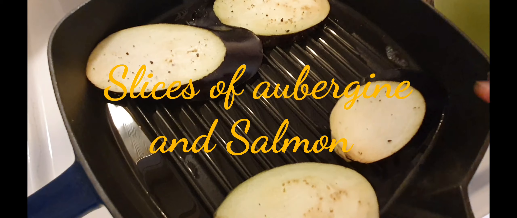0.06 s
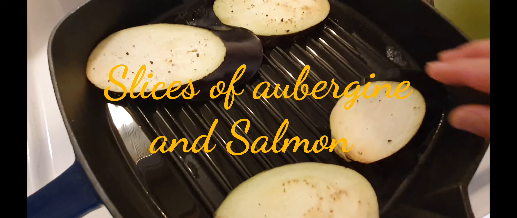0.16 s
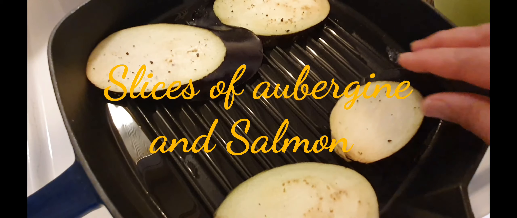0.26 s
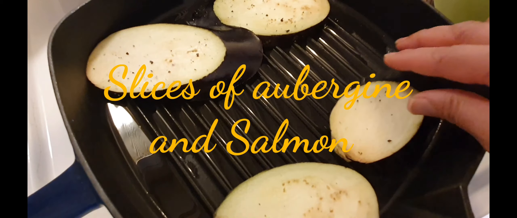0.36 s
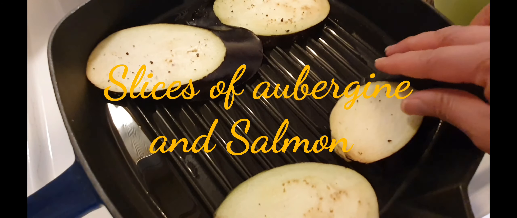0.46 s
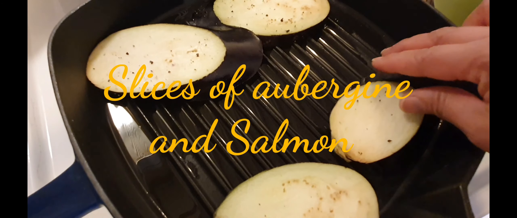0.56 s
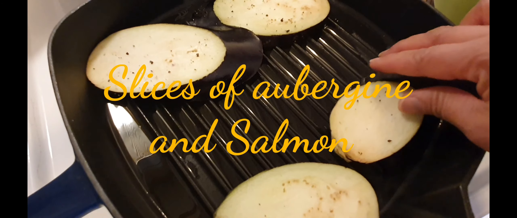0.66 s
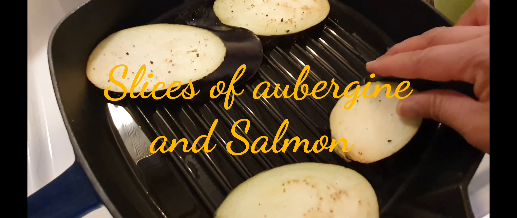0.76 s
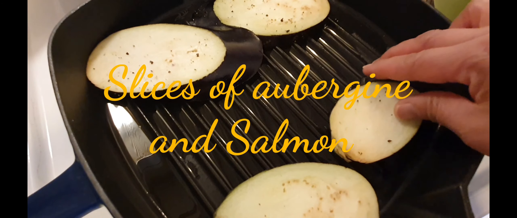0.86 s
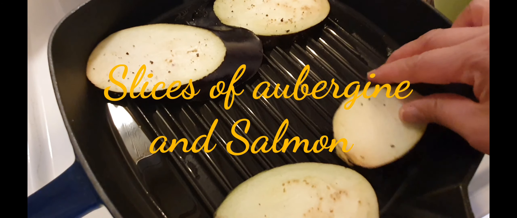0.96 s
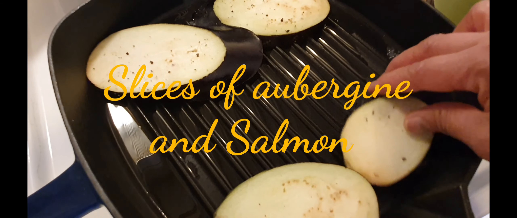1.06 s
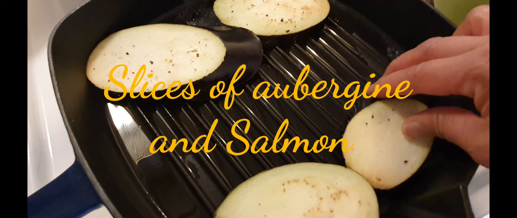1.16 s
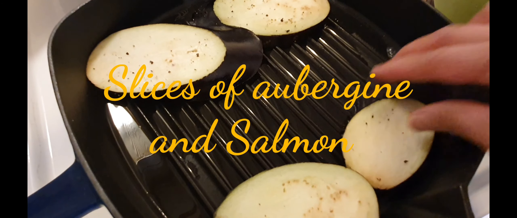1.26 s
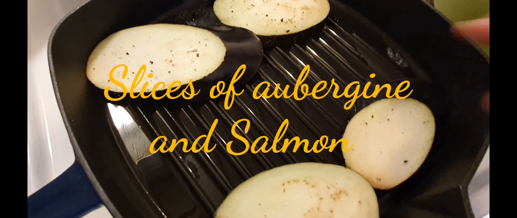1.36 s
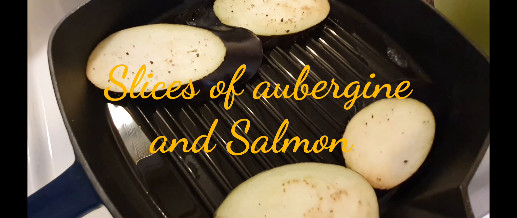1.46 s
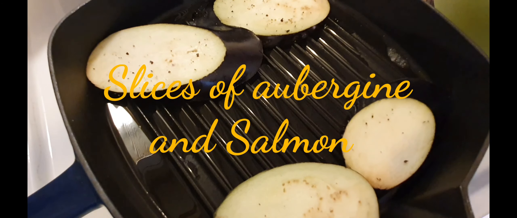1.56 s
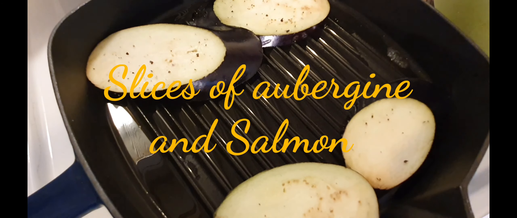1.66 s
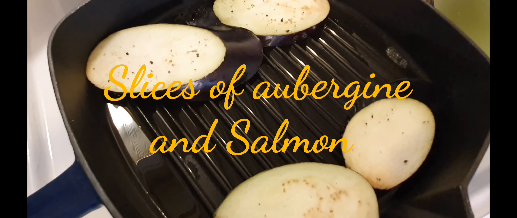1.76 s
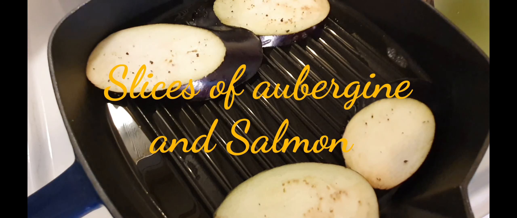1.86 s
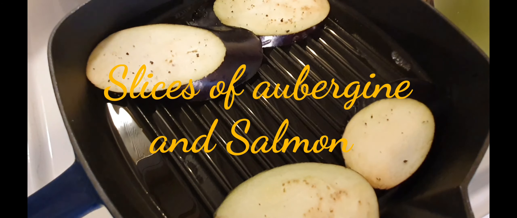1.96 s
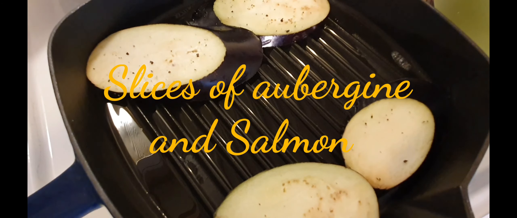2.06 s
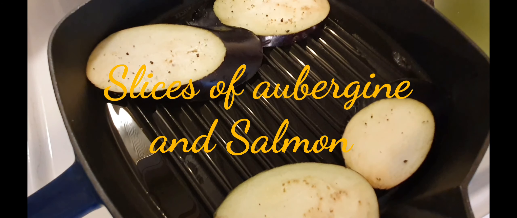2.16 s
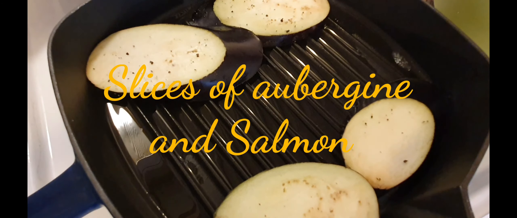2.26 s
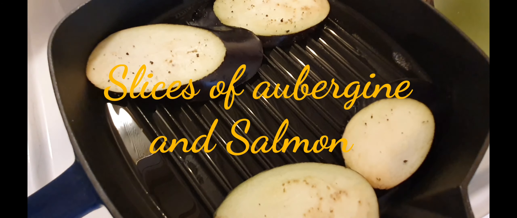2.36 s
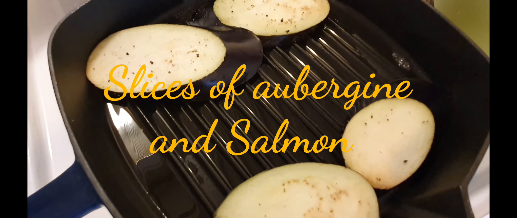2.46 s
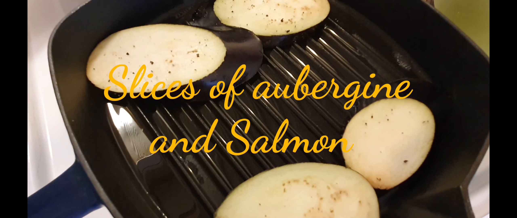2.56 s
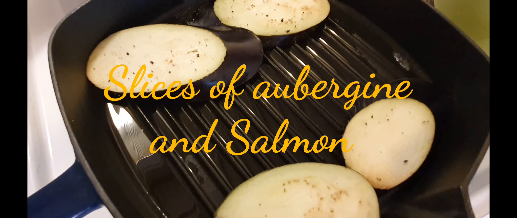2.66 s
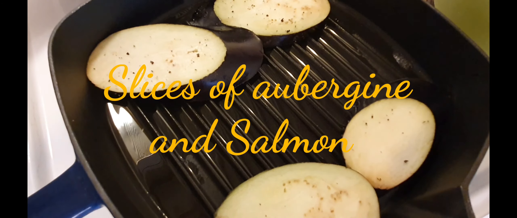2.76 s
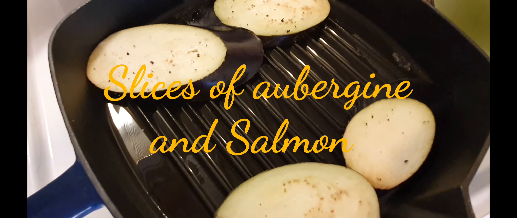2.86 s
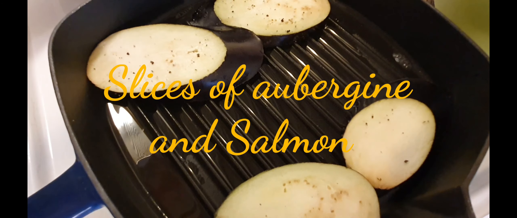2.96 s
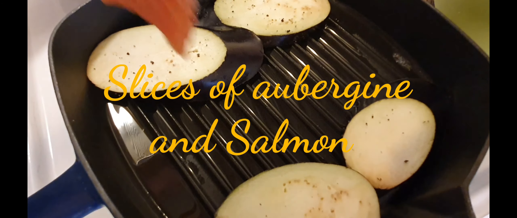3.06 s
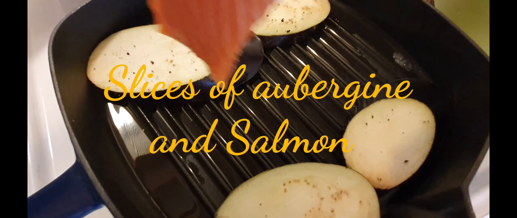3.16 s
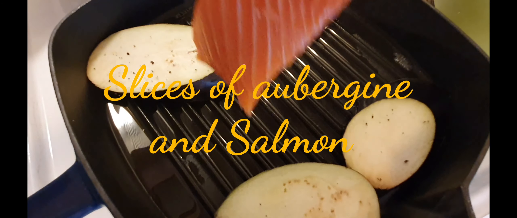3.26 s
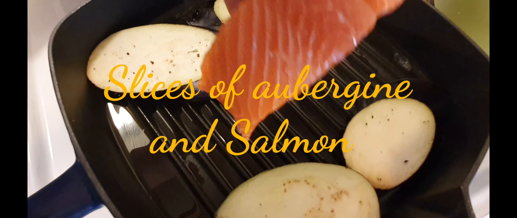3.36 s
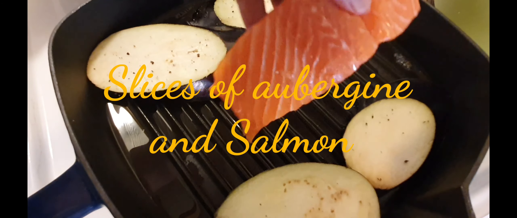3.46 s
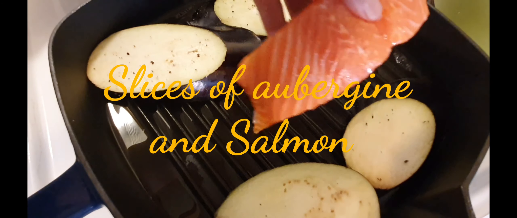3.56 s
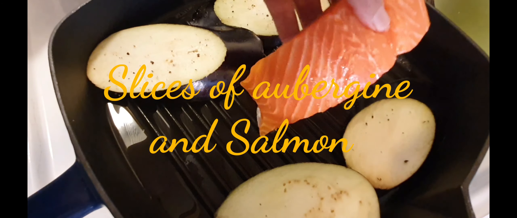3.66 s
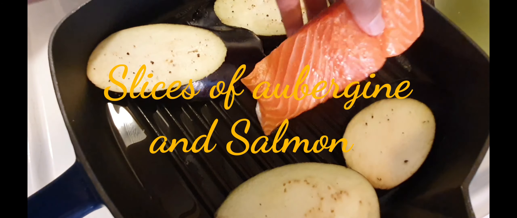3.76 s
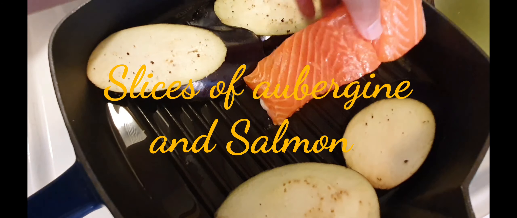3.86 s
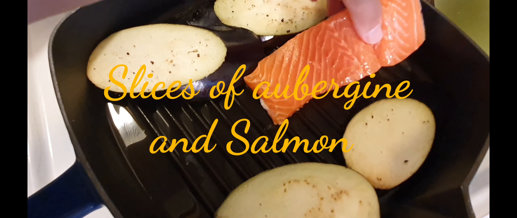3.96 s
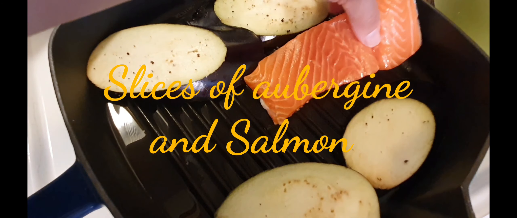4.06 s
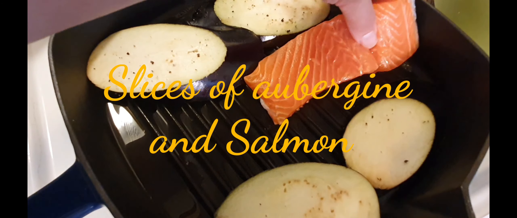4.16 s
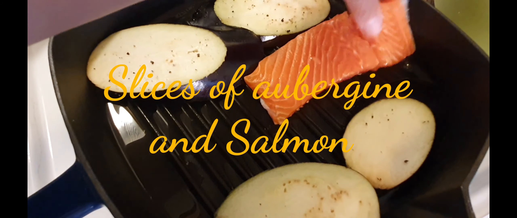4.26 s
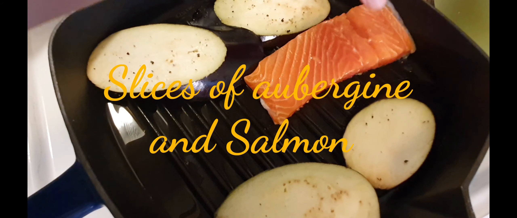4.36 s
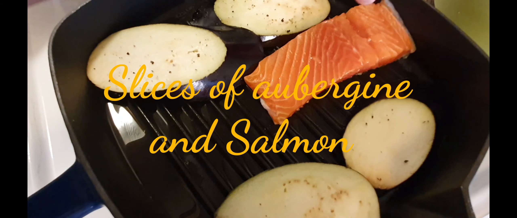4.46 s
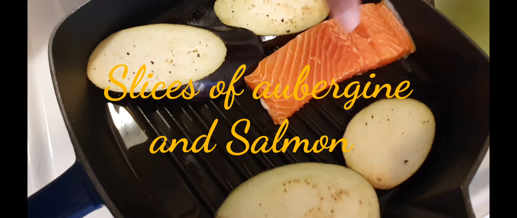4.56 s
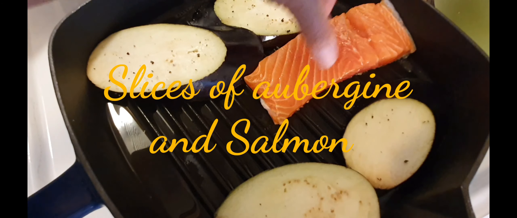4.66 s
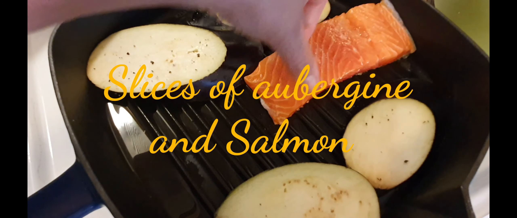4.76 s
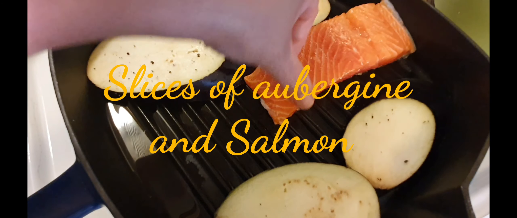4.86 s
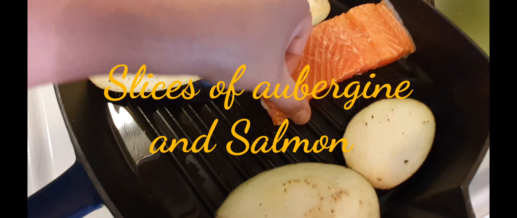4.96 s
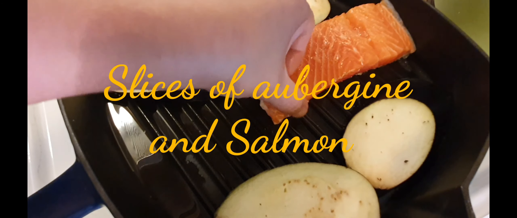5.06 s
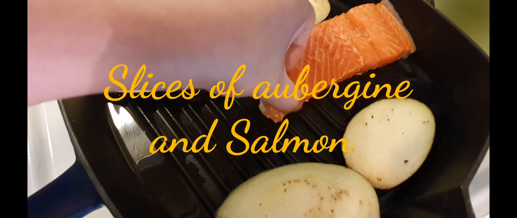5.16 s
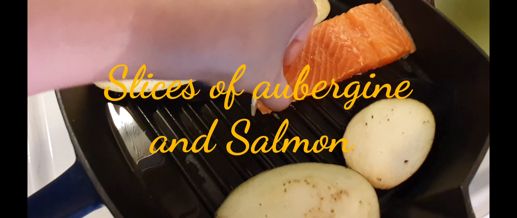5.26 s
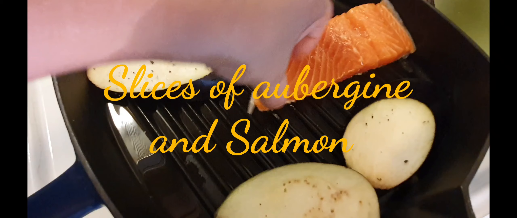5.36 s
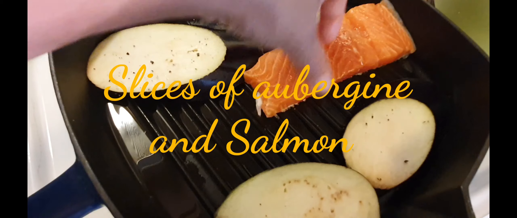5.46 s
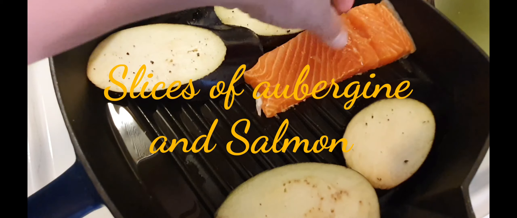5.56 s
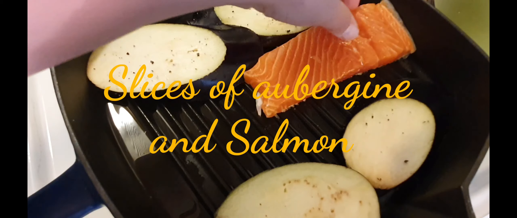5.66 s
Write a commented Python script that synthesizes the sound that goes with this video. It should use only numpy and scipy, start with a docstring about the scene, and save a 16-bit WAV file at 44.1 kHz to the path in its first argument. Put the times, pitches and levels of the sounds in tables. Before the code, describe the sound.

A thin, bright frying hiss opens over low hand rumble, slightly stronger at first, then settling quieter with isolated oil snaps. A brief low judder and soft knocks from the hand on the microphone precede the salmon being laid down. Sharp pops then crowd together, some crisp and some wet, with flares of sizzle as it is pressed. Close, small kitchen, faint iron ring.

```python
"""Salmon and aubergine on a ridged grill pan

Aubergine slices sizzle in oil; a salmon fillet is laid on, pressed down and starts to spit.
The sizzle is thousands of random steam-bubble clicks and ringing blisters, in three bands that move separately.
Water drops pop as filtered snaps with a rim echo and scatter; every burst also rings the iron pan.
The hand-held microphone adds low rumble from filtered noise and one soft bump: a judder, a rub and knocks."""
import sys
import numpy as np
from scipy import signal
from scipy.fft import rfft, irfft
from scipy.io import wavfile
from scipy.ndimage import uniform_filter1d

SR = 44100
rng = np.random.default_rng(int(sys.argv[2]) if len(sys.argv) > 2 else 0)


def inscribe(sig):
    """Save sig as 16-bit PCM at rate SR to the path in sys.argv[1].

    A 1-D sig is mono; a 2-D sig holds one channel per row.
    Samples are clipped to [-1, 1] before scaling.
    """
    pcm = np.round(np.clip(np.atleast_2d(sig).T, -1, 1) * 32767)
    wavfile.write(sys.argv[1], SR, pcm.astype(np.int16))


N = 251800
TIME = np.arange(N) / SR

# Source levels in dB are mix settings; later gains and filters shift them.
# Steady frying: start_s, level_db, brightness_db, mid_hiss_lift_db
FRYING_CURVE = [(0, -40.5, -1.5, -2), (.22, -44.5, -1.5, -1), (.65, -46, -2.6, 0.5), (1.0, -45, -2.8, 0),
                (1.14, -46, 0.1, 2), (1.22, -48.5, -0.4, 1), (1.58, -45, 0.7, 0.2), (1.995, -46.5, -0.6, 0),
                (2.015, -50, -1.1, 0), (2.65, -51, -1.3, 1), (3.05, -48.5, -1.9, -0.7),
                (3.35, -51, -1.4, 1.5), (3.72, -49.5, -1.3, 0), (3.9, -47, 0.5, 1.7), (4.1, -49, 0, 4),
                (4.22, -44, -2, 1.5), (4.72, -43.5, -0.5, 2), (4.95, -46.5, .5, 2.5), (5.71, -44, -1, -0.5)]
# Crackle of the wet food against the fizz: start_s, crackle_db
CRACKLE_CURVE = [(0, -11.5), (1.9, -7.5), (2.1, -11.5), (3.65, -9), (3.8, -1), (4.5, -5), (5.3, 1.5),
                 (5.71, -7.5)]
# Moist flesh meets hot metal and the frying flares up: start_s, attack_s, length_s, level_db
FRYING_FLARES = [(0.99, 0.1, 0.16, -48), (2.792, .015, 0.016, -47.5), (3.724, 0.019, 0.061, -42),
                 (4.47, 0.037, 0.15, -48), (4.796, .015, 0.035, -47), (5.039, 0.031, 0.031, -41),
                 (5.116, 0.021, 0.11, -44.5), (5.266, 0.039, 0.085, -35), (5.401, .025, 0.048, -38)]
# Colour of the sizzling bursts: frequency_hz, level_db
BURST_COLOUR = [(150, -19.5), (440, -18), (560, -22), (680, -17), (830, -9.5), (1020, -8), (1270, -4.5),
                (1550, -2.5), (2300, 1), (3700, 4.5), (5300, 4.5), (7900, 3), (8800, 7.5), (11500, 3.5),
                (15500, 1)]
# Spots where food touches the pan: left_lead_s, left_minus_right_db, level_db
FOOD_SPOTS = [(-.00009, -8, -3.5), (0.0048, 18.5, -5.5), (-.0003, -1, -8.5), (-.00002, 16.5, -12)]
# Resonances of the iron pan: pitch_hz, width_hz, level_db
PAN_RESONANCES = [(561.5, 18, 6.5), (750, 45, -6), (888, 26, -5.5), (1124, 11, -15), (1288, 44, 0),
                  (1740, 47, -16), (1838, 26, -3.5), (2610, 33, -21), (2630, 34, -3), (3340, 15, -2.5),
                  (3410, 6.4, -12)]
# The hand shifts on the microphone and it rumbles: start_s, length_s, level_db
HAND_SHIFTS = [(0, 0.24, -60), (0.309, 0.43, -58.5), (0.79, 0.073, -59.5), (0.9, 0.55, -70),
               (1.472, 0.525, -73.5), (5.492, 0.024, -69)]
# Colour of the hand rumble: frequency_hz, level_db
HAND_COLOUR = [(20, -27), (45, -7), (80, -2), (108, 4.5), (140, -10.5), (172, -5), (230, -17.5), (320, -15),
               (420, -33), (560, -64), (750, -40), (1500, -36)]
# Colour of the steady kitchen murmur: frequency_hz, level_db
KITCHEN_COLOUR = [(20, -15), (55, 4.5), (100, 9), (160, -6), (300, -10.5), (600, -25), (2000, -84)]
# Water drops bursting in the oil:
# start_s, level_db, cavity_pitch_hz, cavity_prominence_db, tear_s, treble_db, left_minus_right_db
LOUD_POPS = [(1.285, -47, 1500, 7, 0.00044, -5, 1), (1.371, -47, 900, 5, 0.00045, -4, 4),
             (1.5824, -40.5, 7100, 13, .0001, -6, -5), (1.863, -42, 7460, 26, .0002, -4, 3),
             (1.897, -36.5, 9600, 30, .0004, 3, -4), (2.9712, -41.5, 10000, 5, .00005, 2, 3),
             (3.1265, -44, 9100, 18, .0004, -8, -4), (3.7747, -40, 9500, 5, 0.000045, -2, -1),
             (3.996, -49, 9500, 7, 0.000055, 8, 0), (4.0216, -27, 9800, 6.5, .00004, 6, 1),
             (4.0676, -30, 9500, 4.5, 0.00023, 4.5, 0), (4.125, -30.5, 11600, 7, .00004, 8, 2),
             (4.1677, -29.5, 2680, 6, 0.00077, -6, 1.5), (4.1988, -24, 4200, -1, 0.000049, 0.5, 2),
             (4.2015, -42, 10000, 8, 0.00016, 0, 3), (4.299, -38.5, 2420, 13, 0.00038, -1, -2),
             (4.307, -29.5, 9500, 6.5, .00004, -2, 2.5), (4.3538, -32.5, 1030, 9, 0.00027, -1, 1),
             (4.3696, -21.5, 10900, 10, 0.000023, 4.5, 3.5), (4.371, -28, 2470, 5.5, 0.00015, -1.5, 1),
             (4.3943, -39, 9800, 8, .0001, 3, -3), (4.4402, -38.5, 2800, -2, 0.00018, -8, 0),
             (4.4467, -29, 840, 2, 0.00004, -0.5, 3), (4.465, -30, 5800, 6, 0.0012, -1.5, 1),
             (4.5062, -33.5, 3660, 5, 0.0001, -17, 0), (4.5299, -32.5, 3830, 14, 0.00008, -19, -1),
             (4.5568, -30, 4300, -7, 0.00096, -2.5, 7), (4.5839, -37.5, 2600, 6, 0.000078, 1, -14),
             (4.599, -30.5, 1360, 2, 0.00018, 0, 6), (4.614, -39, 3000, 3, 0.00024, -4, -6),
             (4.641, -27.5, 4700, 5, .00002, 7, -4), (4.7785, -40, 9500, 8, 0.00022, -2, 0),
             (4.79, -25, 4560, 22, 0.000087, -2, -2), (4.7928, -37, 3520, -1, .0005, -1, 6),
             (4.802, -33.5, 1370, 17.5, 0.0012, 5.5, 0), (4.8045, -37, 4620, 14, 0.00045, -4, 4),
             (4.8125, -38, 4430, 17, 0.00044, -2, 3), (4.821, -39, 4200, 10, .0002, 5, -2),
             (4.839, -36.5, 1500, 15, 0.00035, 5, 4), (4.8465, -40, 7000, 12, 0.00018, -2, 4),
             (4.8624, -29, 11000, 3, .00002, 5, -3), (4.953, -40.5, 920, 12, .0008, -10, 4),
             (4.965, -43, 950, 3, 0.001, -12, 6), (5.019, -30, 2000, -4.5, 0.000057, -0.5, -3),
             (5.0534, -32.5, 9000, 5, 0.00028, 2, -4), (5.086, -35, 4900, 16, .0006, -7, -5),
             (5.093, -39.5, 1100, 19, 0.00087, -9, 1), (5.107, -42, 5000, 20, 0.00054, 0, 0),
             (5.143, -43, 3500, 7, 0.00055, -5, -2), (5.1556, -32, 2870, 12, 0.000046, -14, -5),
             (5.1753, -34, 1710, 8, 0.0016, -9, 3), (5.1972, -35.5, 2180, 3, 0.0011, -14, 5),
             (5.2095, -38, 3800, -2, 0.0009, -14, -6), (5.2305, -35, 700, 8, 0.0011, -5, 3),
             (5.2533, -37.5, 1190, 17, 0.0011, -2, -3), (5.295, -27, 750, 6, 0.00088, -0.5, 2),
             (5.3128, -35, 3300, 7, 0.00024, -6, 10), (5.3222, -33, 3140, 29, 0.0001, -5, -13),
             (5.3495, -32.5, 1020, 15.5, 0.0012, -15, -1), (5.3505, -28, 4860, 7, 0.00013, -8, 6),
             (5.4134, -41, 9500, 2, 0.000069, -1, 12), (5.5245, -26, 4970, 2.5, 0.000045, -4.5, 1.5),
             (5.561, -29.5, 6000, 10.5, 0.000047, 2.5, -3.5), (5.5665, -33.5, 4030, 18, 0.00024, 13, 15),
             (5.6757, -23, 6800, 7, 0.0002, 6, -1.5)]
# Colour all pops share, thin in the bass with a bright hump near 10 kHz: frequency_hz, level_db
SHARED_POP_COLOUR = [(200, -29.5), (400, -13), (600, -13.5), (780, -5), (1300, -6), (2700, 3.5), (4300, 0),
                     (8000, 1.5), (9200, 8), (11000, 5), (15500, -1)]
# Kitchen tail of a pop, duller than the snap: frequency_hz, level_db
POP_TAIL_COLOUR = [(1000, -3), (4000, -2), (9000, -6.5), (15000, -8)]
# The case knocks as the grip settles: start_s, level_db
CASE_KNOCKS = [(3.455, -46.5), (3.495, -40), (3.507, -39), (3.53, -47), (3.56, -53)]
# Ringing of the knocked case: pitch_hz, level_db, t60_s
CASE_RESONANCES = [(63.6, -14, 0.2), (114, -2, 0.21), (286, 3.5, 0.12), (337, -18, 0.04), (472, -2, 0.071),
                   (600, -19, .03), (730, -14.5, 0.046), (930, -17, .05)]
# Colour of the finger rub: frequency_hz, level_db
FINGER_COLOUR = [(25, -30), (100, 4), (180, 1.5), (290, -1), (400, -5), (500, -9), (680, -16), (920, -16),
                 (1400, -45), (3000, -49)]
# How the microphone ports differ: frequency_hz, left_minus_right_db
PORT_DIFFERENCE = [(300, -1), (1000, 4), (2000, 0.5), (4000, -2.5), (6000, 1.5), (8500, -5.5),
                   (12000, -1.5), (15500, 0.5)]

# big wet bubbles, middle of the sizzle and finest spray, relative to the frying level
WET_DB, HISS_DB, SPRAY_DB = -11, -2, 3
FLARE_RELEASE_S = 0.038
SHIFT_ATTACK_S, SHIFT_RELEASE_S = 0.0062, 0.029
KITCHEN_T60_S = 0.28
# cavity width at 1 kHz, and the power by which it grows with pitch
CAVITY_WIDTH_HZ, CAVITY_WIDENING = 446, 0.49
UNEVEN_DB = 2.5  # spread of a cavity's lesser resonances
# once the fillet is down, smaller drops spit at random between the loud ones; SPIT_DB is the weakest
SPIT_START_S, SPITS_PER_S, SPIT_DB, SPIT_SPREAD_DB = 3.8, 36, -48.5, 4
SPIT_LOWEST_HZ, SPIT_HIGHEST_HZ, SPIT_PROMINENCE_DB, SPIT_TEAR_S = 1400, 12300, 9.5, 0.00025
# each pop comes back off the rim, a little sooner or later from place to place (spread as a fraction)
RIM_ECHO_S, RIM_ECHO_SPREAD, RIM_ECHO_DB = 0.00109, 0.265, -5.5
RIDGES_S, RIDGES_DB = 0.00077, -3  # quick scatter between the ridges: decay time and level
WALLS_S, WALLS_DB = 0.0085, -1  # slower scatter off the pan walls and the hob
# a finger slips on the case: the judder peaks at JUDDER_S while the rub builds
JUDDER_S, JUDDER_DB, JUDDER_RISE_DB_PER_S, JUDDER_FALL_DB_PER_S = 3.457, -44, 534, 326
JUDDER_HZ, JUDDER_PRESSED_HZ = 245.3, 286.4  # mean pitch under a light touch and at full pressure
RUB_S, RUB_LENGTH_S, RUB_DB, RUB_ATTACK_S, RUB_RELEASE_S = 3.44, 0.074, -52.5, 0.048, 0.056
TOP_HZ = 15600  # top of the sound's band


def undb(db):
    """Decibels to gain."""
    return 10 ** (np.asarray(db) / 20)


def unit(x):
    """Scale to rms 1."""
    return x / np.sqrt(np.mean(x ** 2))


def curves(table):
    """The columns of a table, joined by straight lines in time."""
    start_s, *columns = np.transpose(table)
    return [np.interp(TIME, start_s, column) for column in columns]


def sides(left_minus_right_db):
    """Left and right gains."""
    return undb(np.array([[.5], [-.5]]) * left_minus_right_db)


def add(out, start_s, sound):
    """Mix a sound into every channel of out at a start time."""
    i = int(start_s * SR)
    out[:, i:i + sound.shape[1]] += sound[:, :N - i]


def colour(x, points, size=4096):
    """Causal filter with the given frequency_hz, level_db spectrum, built from the cepstrum."""
    hz, db = np.transpose(points)
    bins = np.maximum(np.arange(size // 2 + 1) * SR / size, 1)
    gain = undb(np.interp(np.log(bins), np.log(hz), db))
    cepstrum = irfft(np.log(gain))
    # folding the cepstrum forward in time gives minimum phase
    cepstrum[1:size // 2] *= 2
    cepstrum[size // 2 + 1:] = 0
    impulse = irfft(np.exp(rfft(cepstrum)))
    return signal.fftconvolve(x, impulse[None], axes=1)[:, :x.shape[1]]


def band(x, hz, kind):
    """Steep low-, high- or band-pass."""
    return signal.sosfilt(signal.butter(4, hz, kind, fs=SR, output="sos"), x)


def walk(rate):
    """Random levels held 1 / rate s and slewed twice; spread near 1."""
    hold = int(SR / rate)
    steps = np.repeat(rng.standard_normal(N // hold + 1), hold)
    return 1.3 * uniform_filter1d(uniform_filter1d(steps, hold), hold)[:N]


def burst(start_s, length_s, attack_s, release_s):
    """Envelope that rises, holds until its length is over and dies away."""
    t = TIME - start_s
    return np.clip(t / attack_s, 0, 1) * np.exp(-np.maximum(t - length_s, 0) / release_s)


def click(delay_s, lead_s, size):
    """One arrival at the two ports; a positive lead brings the left one first."""
    t = TIME[:size] - .0005
    return np.sinc((t - delay_s + np.array([[.5], [-.5]]) * lead_s) * SR)


def fade(decay_s, size):
    """Envelope of the scattered sound that follows an arrival; energy 1."""
    t = TIME[:size] - .0005
    return unit(np.exp(-np.abs(t) / decay_s) * (t > 0)) / np.sqrt(size)


def diffuse(size, shared_hz=1250):
    """Noise of scattered sound at the two ports; long waves reach both alike."""
    noise = rng.standard_normal((3, size))
    return band(noise[2], shared_hz, "low") + band(noise[:2], shared_hz, "high")


def bubbles(per_s, spread_db):
    """Tiny steam bubbles of unequal size burst at random, each a bare click."""
    shape = len(FOOD_SPOTS), N
    bursting = rng.random(shape) < per_s / len(FOOD_SPOTS) / SR
    sizes = undb(spread_db * np.minimum(rng.exponential(size=shape), 3.5))
    return bursting * sizes * rng.choice([-1, 1], shape)


def blisters(spread_db, cycles, lowest_hz, highest_hz, count):
    """Larger blisters break with a brief ring, each at a pitch of its own."""
    tracks, t = np.zeros((len(FOOD_SPOTS), N)), TIME[:256]
    for k, (when, pitch, luck) in enumerate(rng.random((count, 3))):
        hz = lowest_hz + (highest_hz - lowest_hz) * pitch ** 2
        size = undb(spread_db * min(-np.log(luck), 3.5))
        # high rings die sooner and start stronger, which keeps the crackle bright
        ring = hz ** .75 * np.sin(2 * np.pi * hz * t) * np.exp(-t * hz / cycles)
        add(tracks[k % len(FOOD_SPOTS)][None], when * TIME[-1], size * ring[None])
    return tracks


def at_ports(tracks, spray_db, room_db, spray_s=0.003, size=8192):
    """Carry one track per spot to both ports by direct click, quick pan scatter and kitchen tail; rms 1."""
    direct, power = 0, 0
    for track, (lead_s, balance_db, level_db) in zip(tracks, FOOD_SPOTS):
        heard = undb(level_db) * sides(balance_db) * track
        # a lead far longer than this short window leaves little but scatter
        arrivals = click(0, lead_s, size=48)
        direct = direct + np.array([np.convolve(port, arrival)[:N] for port, arrival in zip(heard, arrivals)])
        power = power + heard ** 2
    scatter = undb(spray_db) * fade(spray_s, size)
    kitchen = undb(room_db) * fade(KITCHEN_T60_S / np.log(1000), size)
    tail = np.hypot(scatter, kitchen)
    # noise follows the burst power, smeared by the tail
    tail_power = np.abs(signal.fftconvolve(power, tail[None] ** 2, axes=1)[:, :N])
    return unit(direct + diffuse(N) * np.sqrt(tail_power))


def split(x, low_hz=2300, high_hz=8200):
    """Low, middle and high parts that add up to the whole."""
    hz, spectrum = np.arange(N // 2 + 1) * SR / N, rfft(x)
    low, high = 1 / (1 + (hz / low_hz) ** 4), 1 - 1 / (1 + (hz / high_hz) ** 12)
    return [irfft(spectrum * part, N) for part in (low, 1 - low - high, high)]


def sizzle(wet_balance_db=-2.1, hiss_balance_db=0, spray_balance_db=-2, simmer_db=0.33):
    """Fine fizz and sparser crackle flare at touchdown; big bubbles sound low and the finest spray high."""
    steady_db, bright_db, lift_db = curves(FRYING_CURVE)
    crackle_db, = curves(CRACKLE_CURVE)
    flares = [undb(level_db) * burst(start_s, length_s, attack_s, FLARE_RELEASE_S)
              for start_s, attack_s, length_s, level_db in FRYING_FLARES]
    simmer = undb(simmer_db * walk(11) + 0.22 * walk(35))
    boiling = np.linalg.norm([undb(steady_db), *flares], axis=0) * simmer
    fizz = at_ports(bubbles(per_s=12000, spread_db=3.0), spray_db=0.0, room_db=-8.5)
    blister_tracks = blisters(spread_db=2.0, cycles=1.2, lowest_hz=736, highest_hz=14150, count=2800)
    crackle = at_ports(blister_tracks, spray_db=2, room_db=-6.5)
    # more crackle makes the stream coarser but no louder
    crackle_gain = undb(crackle_db)
    stream = (fizz + crackle_gain * crackle) / np.hypot(1, crackle_gain)
    wet, hiss, spray = split(colour(stream, BURST_COLOUR))
    wet = unit(wet) * undb(WET_DB - bright_db + 0.88 * walk(25.7)) * sides(wet_balance_db)
    hiss = unit(hiss) * undb(HISS_DB + lift_db + 0.23 * walk(12)) * sides(hiss_balance_db)
    spray = unit(spray) * undb(SPRAY_DB + bright_db + 0.12 * walk(25.0)) * sides(spray_balance_db)
    return (wet + hiss + spray) * boiling


def pan(x, ring_db=-1):
    """Every burst also sets the pan ringing faintly, which hollows the low, wet pops."""
    ring = sum(undb(level_db) * signal.lfilter(*signal.iirpeak(hz, hz / width_hz, fs=SR), x)
               for hz, width_hz, level_db in PAN_RESONANCES)
    return x + undb(ring_db) * ring


def low_noise(points, side_db):
    """Coloured noise of rms 1, nearly alike at both ports when the side level is low."""
    mid, side = rng.standard_normal((2, N))
    return unit(colour(mid + undb(side_db) * side * np.array([[1], [-1]]), points))


def rumble(flutter_db=2.0, kitchen_db=-79):
    """Uneven rumble of the hand holding the microphone, over the steady low murmur of the kitchen."""
    moving = sum(undb(level_db) * burst(start_s, length_s, SHIFT_ATTACK_S, SHIFT_RELEASE_S)
                 for start_s, length_s, level_db in HAND_SHIFTS)
    flutter = undb(flutter_db * walk(20.97))
    hand = low_noise(HAND_COLOUR, side_db=-8.5) * moving * flutter * sides(-1.8)
    return hand + low_noise(KITCHEN_COLOUR, side_db=-1.0) * undb(kitchen_db)


def spits(balance_spread_db=5, treble_db=0):
    """Rows like those of the loud pops, for the small drops that burst at random."""
    span_s = TIME[-1] - SPIT_START_S
    rows = []
    for when, pitch, size, side in rng.random((int(SPITS_PER_S * span_s), 4)):
        start_s = SPIT_START_S + span_s * when
        hz = SPIT_LOWEST_HZ * (SPIT_HIGHEST_HZ / SPIT_LOWEST_HZ) ** pitch
        level_db = SPIT_DB - SPIT_SPREAD_DB * np.log(max(size, .1))
        balance_db = balance_spread_db * (2 * side - 1)
        rows.append((start_s, level_db, hz, SPIT_PROMINENCE_DB, SPIT_TEAR_S, treble_db, balance_db))
    return rows


def pop_paths(count, lead_s=-0.000035, size=6000):
    """Each pop's ways to the ports: straight, off the rim, between ridges, off walls and round the kitchen."""
    near = np.hypot(undb(RIDGES_DB) * fade(RIDGES_S, size), undb(WALLS_DB) * fade(WALLS_S, size))
    far = fade(KITCHEN_T60_S / np.log(1000), size)
    scatter, kitchen = diffuse(N), colour(diffuse(N), POP_TAIL_COLOUR)
    for place, offset in rng.random((count, 2)):
        i = int(offset * (N - size))
        rim_s = RIM_ECHO_S * (1 + RIM_ECHO_SPREAD * (2 * place - 1))
        path = near * scatter[:, i:i + size] + far * kitchen[:, i:i + size]
        straight = click(0, lead_s, size=160)
        rim_echo = undb(RIM_ECHO_DB) * click(rim_s, lead_s, size=160)
        add(path, 0, straight + rim_echo)
        yield path


def pops(gain_db=0.5, treble_hz=8500):
    """Each drop flashes to steam in an uneven cavity: a quick tear snaps, a slow wet one squelches."""
    out = np.zeros((2, N))
    lead_s, first_s = .003, .005  # quiet lead-in, and the attack that sets the level
    t = TIME[:512] - lead_s
    grid = np.geomspace(100, 20000, 120)  # Hz
    treble = 1 - 1 / (1 + (grid / treble_hz) ** 10)
    shared_hz, shared_db = np.transpose(SHARED_POP_COLOUR)
    shared_db = np.interp(np.log(grid), np.log(shared_hz), shared_db)
    drops = [*LOUD_POPS, *spits()]
    for drop, path in zip(drops, pop_paths(count=len(drops))):
        start_s, level_db, hz, prominence_db, tear_s, treble_db, balance_db = drop
        width_hz = CAVITY_WIDTH_HZ * (hz / 1000) ** CAVITY_WIDENING
        cavity_db = prominence_db * np.exp(-.5 * ((grid - hz) / width_hz) ** 2)
        # every cavity draws its own lesser resonances
        ripple = unit(uniform_filter1d(rng.standard_normal(len(grid)), size=3))
        uneven_db = UNEVEN_DB * ripple * (1 - treble)
        # the tearing film smears the click without colouring it
        tear = rfft(rng.standard_normal(len(t)) * np.exp(-np.abs(t) / tear_s) * (t > 0))
        snap = irfft(tear / np.abs(tear))
        spectrum_db = shared_db + cavity_db + uneven_db + treble_db * treble
        arriving = signal.fftconvolve(path, snap[None], axes=1)
        pop = colour(arriving, np.column_stack([grid, spectrum_db]))
        attack = pop[:, int(lead_s * SR):int((lead_s + first_s) * SR)]
        pop = pop / np.sqrt(np.mean(attack ** 2)) * undb(level_db + gain_db) * sides(balance_db)
        # begin early, so that the snap lands near start_s
        add(out, start_s - lead_s - .0007, pop)
    return out


def swell(peak_s, rise_db_per_s, fall_db_per_s):
    """Envelope that grows to 1 at its peak and fades at once."""
    t = TIME - peak_s
    return undb(np.minimum(rise_db_per_s * t, -fall_db_per_s * t))


def grip(rough_db=3, overtone_db=-21, judder_balance_db=10, rub_balance_db=6):
    """A finger judders and rubs over the case, higher as it presses, and a few soft knocks ring it."""
    pressure = swell(JUDDER_S, JUDDER_RISE_DB_PER_S, JUDDER_FALL_DB_PER_S)
    hz = JUDDER_HZ + (JUDDER_PRESSED_HZ - JUDDER_HZ) * pressure ** 2
    phase = 2 * np.pi * np.cumsum(hz * (1 + 0.025 * walk(120))) / SR
    tone = unit(np.sin(phase) + undb(overtone_db) * np.sin(2 * phase))
    judder = tone * pressure * undb(JUDDER_DB + rough_db * walk(90))
    skin = unit(colour(rng.standard_normal((1, N)), FINGER_COLOUR))
    rub = skin * undb(RUB_DB) * burst(RUB_S, RUB_LENGTH_S, RUB_ATTACK_S, RUB_RELEASE_S)
    out = judder * sides(judder_balance_db) + rub * sides(rub_balance_db)
    t = TIME[:SR // 3]
    ring = sum(np.sin(2 * np.pi * mode_hz * t) * undb(mode_db - 60 * t / t60_s)
               for mode_hz, mode_db, t60_s in CASE_RESONANCES)
    knock = ring * (1 - np.exp(-t / 0.0068))  # soft onset
    for start_s, level_db in CASE_KNOCKS:
        add(out, start_s, knock * undb(level_db) * sides(2.1))
    return out


def scene(cooking_db=-1.67):
    """The frying in the pan, and the hand on the microphone."""
    return undb(cooking_db) * pan(sizzle() + pops()) + rumble() + grip()


def record(dry):
    """The two ports colour the sound differently, and the band ends at TOP_HZ."""
    left = colour(dry[:1], [(hz, db / 2) for hz, db in PORT_DIFFERENCE])
    right = colour(dry[1:], [(hz, -db / 2) for hz, db in PORT_DIFFERENCE])
    top_cut = signal.ellip(10, .2, 70, TOP_HZ, fs=SR, output="sos")
    return signal.sosfilt(top_cut, np.vstack([left, right]))


dry = scene()
out = record(dry)
inscribe(out)
```